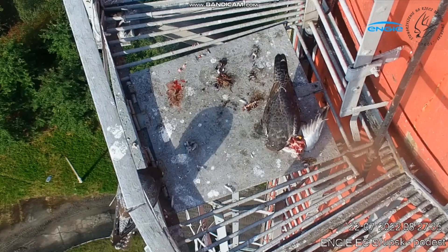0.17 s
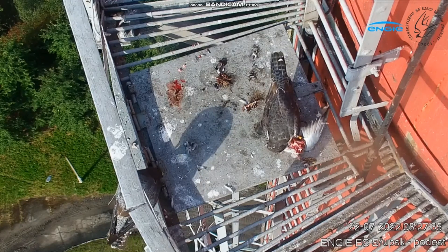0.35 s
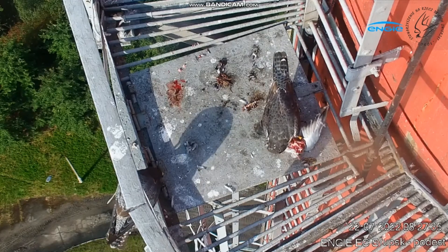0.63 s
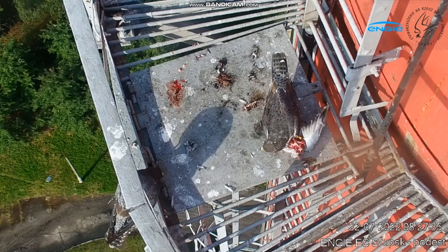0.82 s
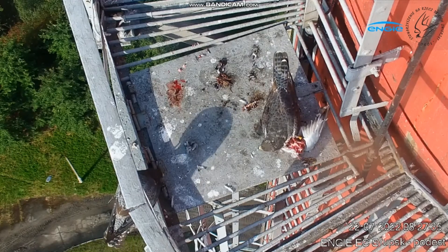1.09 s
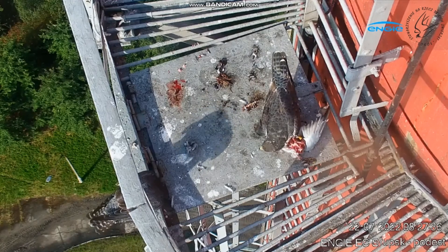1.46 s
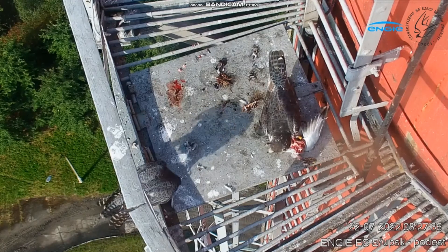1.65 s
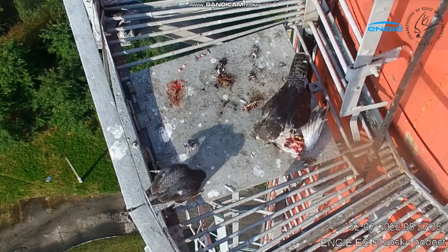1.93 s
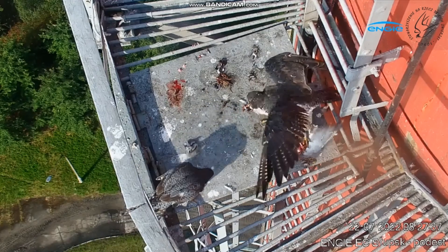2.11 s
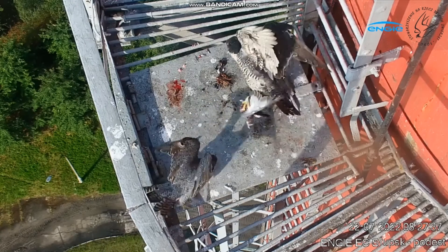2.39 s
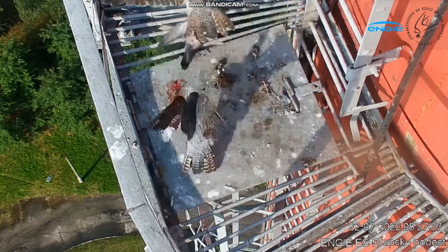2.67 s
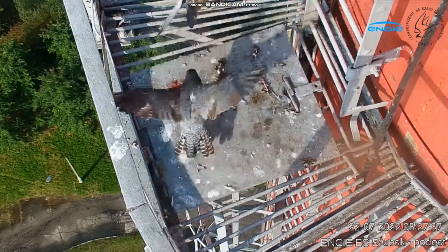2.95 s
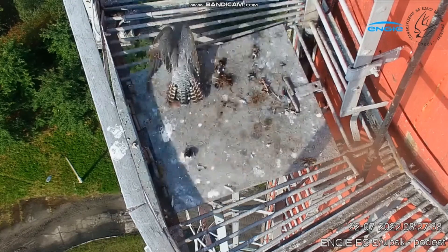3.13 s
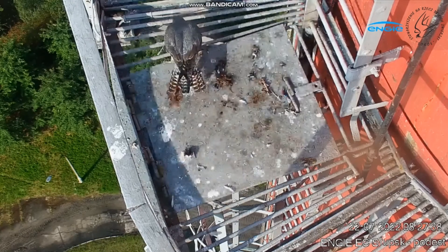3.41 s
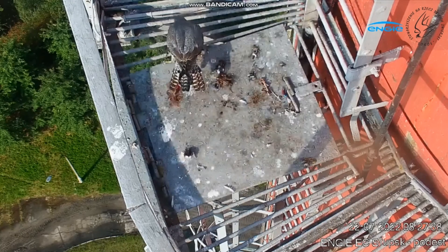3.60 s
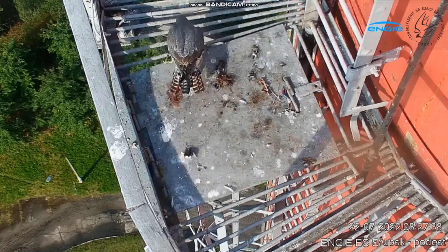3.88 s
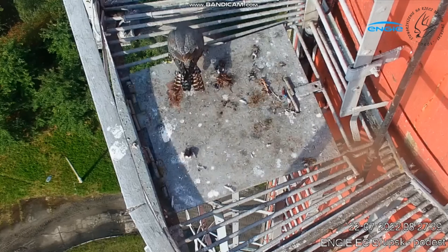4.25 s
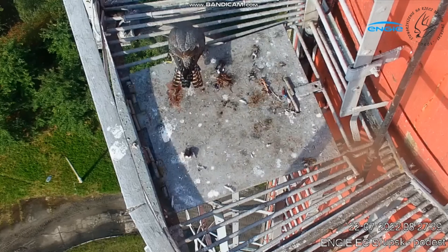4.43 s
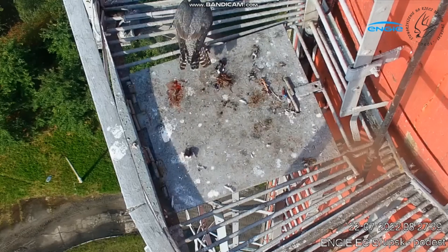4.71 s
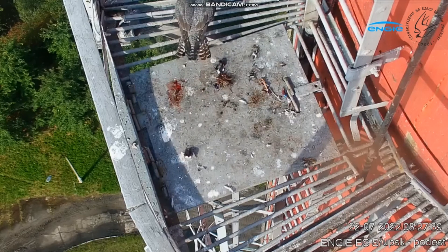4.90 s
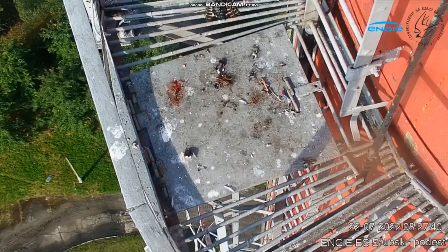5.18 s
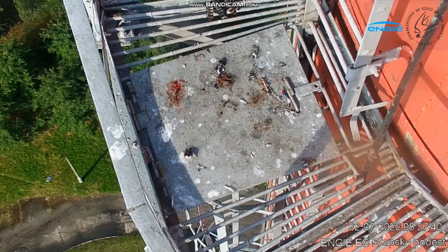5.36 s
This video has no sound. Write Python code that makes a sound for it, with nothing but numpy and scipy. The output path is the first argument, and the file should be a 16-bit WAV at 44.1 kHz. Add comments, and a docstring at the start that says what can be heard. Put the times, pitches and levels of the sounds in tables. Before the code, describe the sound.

Two falcons squabble on a high steel platform in rapid, harsh, squeaky chatter over low rumbling wind, distant traffic and a thin whine.

```python
"""Wind and far traffic rumble under a thin 4 kHz whine; at once two falcons quarrel on a high steel platform.
Their short, mostly falling notes are harmonic stacks from a beating membrane, with sidebands of a second one.
Ragged noise torn by the throat surrounds each note, and low clucks of the slack membrane frame some of them.
Platform echoes are a decaying noise tail; the rumble is flickering bands of noise, the whine a fluttering sine."""
import sys
import numpy as np
from scipy import signal
from scipy.io import wavfile

SR = 44100
rng = np.random.default_rng(int(sys.argv[2]) if len(sys.argv) > 2 else 0)


def master(y):
    """Save y as 16-bit WAV."""
    cut = np.clip(np.atleast_2d(y).T, -1, 1)
    pcm = np.round(cut * 32767)  # scale
    wavfile.write(sys.argv[1], SR, pcm.astype(np.int16))


N = 244755

# Called notes: onset t/s, rise t/ms, fall t/ms, middle pitch f/Hz, sag of the pitch f/Hz,
# relative level/dB of the 1st, 2nd and 3rd harmonic, relative level/dB of the rasp
CALL_NOTES = [(0.149, 26, 22, 2153, 169, -40, -36.5, -47.5, -41.5),
              (0.163, 14, 30, 1716, 121, -37.5, -35.5, -41.5, -56),
              (0.329, 17.3, 21.2, 2181, 84, -18.5, -32.5, -39, -37.5),
              (0.431, 21, 16.5, 2248, 76, -41, -43, -40, -37.5),
              (0.461, 9, 26, 1533, 4, -47, -40, -63, -55.5),
              (0.608, 17, 21.5, 2266, 145, -22, -32, -41.5, -33.5),
              (0.635, 12.9, 15.6, 1543, -60, -40.5, -28, -46, -29.5),
              (0.815, 22.7, 6.5, 2368, 72, -18, -26.5, -42.5, -28.5),
              (0.894, 31.5, 14, 2283, 246, -38.5, -37, -41, -42),
              (1.07, 32.7, 14.4, 2293, 279, -14, -24.5, -35, -33.5),
              (1.139, 15, 45, 1813, 502, -45.5, -37.5, -46, -43),
              (1.272, 15.6, 24, 2228, 33, -22.5, -41, -43.5, -57),
              (1.303, 13.1, 30.4, 1941, 247, -28.5, -27, -40, -36.5),
              (1.434, 28, 22, 1830, 27, -49.5, -47, -50, -47),
              (1.525, 18.2, 4.3, 1797, 42, -40.5, -41.5, -44, -54),
              (1.613, 23.4, 6.4, 1850, 100, -30.5, -38.5, -46.5, -47.5),
              (1.67, 33.5, 5.5, 2160, 142, -34, -32, -46, -34.5),
              (1.703, 8.6, 12, 1770, 147, -33.5, -38, -44.5, -56),
              (1.806, 20, 15.5, 1845, 53, -61, -39.5, -44, -59),
              (1.845, 20.8, 7.3, 1960, 154, -33, -46.5, -42, -59),
              (1.935, 30, 6.5, 2304, -10, -33, -35, -64, -34.5),
              (1.971, 25.3, 5.4, 1538, -42, -47.5, -31, -57, -34),
              (2.087, 15, 16.4, 2304, 138, -46.5, -43, -48.5, -49.5),
              (2.151, 27.4, 7.1, 2388, 50, -37, -32.5, -62, -30.5),
              (2.242, 7.1, 27, 2037, 29, -43, -40.5, -34.5, -43),
              (2.267, 9, 13, 2310, 99, -26, -33.5, -46, -61),
              (2.407, 28.3, 11.4, 2310, 159, -26.5, -26.5, -62, -30.5),
              (2.415, 13.8, 23.5, 2062, 42, -19.5, -29, -40, -36),
              (2.535, 18, 14.6, 2483, 56, -39.5, -42, -53, -48.5),
              (2.609, 15.4, 32, 2223, 3, -33, -38.5, -73, -43.5),
              (2.648, 6, 41, 1935, 211, -34, -31.5, -55.5, -41.5),
              (2.715, 19, 13, 2476, 91, -25, -36, -50, -39.5),
              (2.723, 26, 21.0, 1958, 224, -48.5, -44.5, -40, -79),
              (2.815, 9.7, 12, 1826, 24, -55, -51, -74, -61.5),
              (2.909, 8.7, 28.6, 1934, 137, -23.5, -29.5, -38.5, -49.5),
              (2.952, 4.8, 32, 1805, 109, -55, -38.5, -58, -79),
              (3.042, 9.9, 11, 1790, 215, -35.5, -37, -51.5, -58),
              (3.108, 20, 28, 2390, 76, -46.5, -43.5, -51, -49),
              (3.166, 14, 18.4, 1925, 241, -44.5, -44, -48.5, -80),
              (3.289, 28, 2.9, 2386, 101, -24, -34, -49.5, -39),
              (3.364, 14, 17.5, 1899, 93, -55, -38.5, -35, -50.5),
              (3.541, 10.8, 22.5, 1936, 97, -26, -28, -37.5, -40.5),
              (3.576, 29.4, 12.7, 2320, 193, -39.5, -33.5, -62, -38.5),
              (3.634, 19, 24, 2184, 178, -47, -36.5, -41, -42.5),
              (3.738, 3.3, 38, 2020, -9, -39, -31.5, -43.5, -36),
              (3.804, 23.3, 25.4, 2195, 183, -21.5, -23.5, -39.5, -37),
              (3.939, 55, 18.4, 2120, 263, -47, -45, -45, -47.5),
              (4.071, 27, 8.7, 2456, 18, -36, -41, -67, -40),
              (4.118, 49.4, 16, 2145, 218, -24, -28.5, -43.5, -38),
              (4.267, 21, 18, 1947, 202, -34.5, -32, -40.5, -51.5),
              (4.328, 16.1, 30, 2210, 200, -46, -45.5, -48.5, -51),
              (4.494, 42.5, 12, 2230, 201, -23, -36.5, -50, -37.5),
              (4.617, 15.3, 13.5, 2154, -59, -39.5, -52, -53, -52),
              (4.644, 30.6, 10.6, 2406, 62, -34, -36.5, -57, -41.5),
              (4.793, 44.5, 23.5, 2060, 314, -25.5, -31.5, -47, -43.5),
              (4.899, 24, 46.4, 1880, 216.5, -40.5, -36, -41.5, -46),
              (5.114, 9.5, 39, 1803, 112, -27.5, -28, -42, -45),
              (5.173, 21, 28.9, 2182, 165, -33.0, -31, -48.5, -38.5),
              (5.252, 11.9, 24.6, 1983, 115, -45.5, -47, -47.5, -54),
              (5.407, 39, 21, 2032, 263.5, -27.5, -33, -49.5, -53.5),
              (5.471, 23.4, 52.0, 2154, 235, -39.0, -33.5, -52, -40)]
# Flaps of the slack membrane as the voice starts or stops: t/s, peak level of the fundamental/dB, pitch f/Hz
MEMBRANE_CLUCKS = [(0.136, -34.5, 355), (0.318, -20.5, 380), (0.374, -18.5, 397), (0.583, -19.5, 444),
                   (0.636, -23.5, 450), (0.798, -20.5, 462), (0.856, -22.5, 465), (1.054, -18.5, 416),
                   (1.123, -21.5, 395), (2.229, -32, 432), (2.301, -32, 423), (3.787, -26.5, 448),
                   (4.103, -32.5, 413)]
# Spectrum of the noise from the throat: f/Hz, relative level per Hz/dB
THROAT_SPECTRUM = [(600, -7.5), (1000, -29), (1500, -11.5), (2100, -5), (2900, -5.5), (4500, -9.5),
                   (7000, -20), (15800, -77.5)]

SCOOP_HZ, SCOOP_S, BURST_S = 111.1, 0.0068, .014   # notes that rise faster than BURST_S set in sharp
CLIMB = .22   # share of the sag that the pitch climbs before it slides
LOW_NOTE_HZ = 1620   # notes below keep a strong 4th harmonic
RING_HZ, RING_WIDTH_HZ, RING_DB = 12720, 1730, 5   # the open beak lifts the highest harmonics
CRACK_DB, CRACK_S = 12, 0.0048   # a loud and raspy note cracks into broad hiss at its height
TAIL_SPLIT_HZ, TREBLE_TAIL = 2840, 0.29   # above the split, rasp lead and tail shrink to this share
PLATFORM_T60_S, PLATFORM_DB = .12, -17   # decay time and total level of the echoes
WHINE_HZ = 4000
CUTOFF_HZ = 16130


def voices():
    """Harmonic source: a membrane beats near 2 kHz, its pitch and strength shaking from beat to beat."""
    out = np.zeros(N)
    for start, rise_ms, fall_ms, hz, sag_hz, *lowest_db, rasp_db in CALL_NOTES:
        rise, fall = rise_ms / 1000, fall_ms / 1000
        t = np.arange(-rise - .03, fall + .05, 1 / SR)   # 0 at the height of the note
        pitch = glide(t, hz, sag_hz, rise, fall)
        shaken_pitch = pitch * (1 + 0.01 * drift(150, size=len(t)))
        phase = 2 * np.pi * (np.cumsum(shaken_pitch) / SR + rng.random())
        level = swell(t, rise, fall, edge_db=-10.5, bend=1.45)
        note = 0
        for k, db in enumerate(harmonic_levels(lowest_db, hz)):
            shake = from_db(min(5.67 + 2.34 * k, 11.0) * np.tanh(drift(58, size=len(t))))
            squeezed = level ** (1 + 0.095 * k)   # upper harmonics need more effort
            ring_db = RING_DB * np.exp(-(((k + 1) * pitch - RING_HZ) / RING_WIDTH_HZ) ** 2)
            note = note + from_db(db + ring_db + 7.5) * shake * squeezed * np.sin((k + 1) * phase)
        crack = from_db(lowest_db[0] + rasp_db + CRACK_DB) * np.exp(-(t / CRACK_S) ** 2)
        note = note + crack * np.diff(rng.standard_normal(len(t) + 1))
        # the sidebands are rougher away from the height of the note
        rough = (1 - level / 2) * swell(t, rise + 0.012, fall + 0.018, edge_db=-9, bend=2.5)
        note = note + from_db(rasp_db + 8) * rough * sidebands(phase, pitch, t)
        add(out, note, start + rise + t[0])
    return out


def harmonic_levels(lowest_db, hz):
    """Spectral roll-off: harmonics 4 to 8 fall from the one two below, odd and even apart, down to a floor."""
    levels_db = list(lowest_db)
    for k in range(3, 8):
        drop_db = 27.0 if hz > LOW_NOTE_HZ or k > 3 else 8.5
        floor_db = max(lowest_db) - 11.0 - 7.07 * k
        levels_db.append(max(levels_db[k - 2] - drop_db, floor_db))
    return levels_db


def glide(t, hz, sag_hz, rise, fall):
    """Frequency modulation: the pitch finds its place, climbs a little, slides and settles, wavering."""
    middle = .33 * (fall - rise)
    slide = np.tanh((t - middle) / (0.17 * (rise + fall))) / 2
    climb = CLIMB * np.clip((middle - t) / (middle + rise), 0, 1) ** 2
    scoop = SCOOP_HZ * (rise < BURST_S) * np.exp(-np.maximum(t + rise, 0) / SCOOP_S)
    waver = 1 + .005 * drift(35, size=len(t))
    return waver * (hz - sag_hz * (slide + climb) + scoop)


def sidebands(phase, pitch, t):
    """Intermodulation: a slower, unsteady membrane beats against the first, with lines beside each harmonic."""
    slow_hz = pitch * min(rng.uniform(0.35, .6), .5)   # often locked at half the pitch
    slow_phase = 2 * np.pi * np.cumsum(slow_hz * (1 + .07 * drift(70, size=len(t)))) / SR
    out = 0
    for k in range(1, 5):
        for side in (-1, 1):
            flicker_db = 11 * np.tanh(drift(75, size=len(t))) - 6   # breaks up the line
            line_hz = np.maximum(k * pitch + side * slow_hz, 1000)
            gain = from_db(at_hz(THROAT_SPECTRUM, line_hz) + flicker_db)
            out = out + gain * np.sin(k * phase + side * slow_phase)
    return out


def rasp():
    """Turbulence: air torn by the throat in ragged grains leads and outlasts each note and rides on clucks."""
    body, treble = np.zeros(N), np.zeros(N)   # powers, so that overlapping notes add
    for start, rise_ms, fall_ms, *_, rasp_db in CALL_NOTES:
        rise, fall = rise_ms / 1000, fall_ms / 1000
        t = np.arange(-rise - .05, fall + .08, 1 / SR)
        for power, share in ((body, 1), (treble, TREBLE_TAIL)):
            level = swell(t, rise + 0.021 * share, fall + 0.043 * share, edge_db=-11, bend=1.7)
            add(power, (from_db(rasp_db - 2.5) * level) ** 2, start + rise + t[0])
    for s, db, hz in MEMBRANE_CLUCKS:
        puff = from_db(1.29 * db) * np.hanning(round(0.037 * SR))
        add(body, puff ** 2, s - .013)
    torn = banded_noise(THROAT_SPECTRUM, count=36, patchy_db=13, patch_hz=40, together=.3)
    torn = rms_one(torn * from_db(5 * np.tanh(drift(190))))
    low = signal.sosfilt(signal.butter(2, TAIL_SPLIT_HZ, "low", fs=SR, output="sos"), torn)
    high = signal.sosfilt(signal.butter(2, TAIL_SPLIT_HZ, "high", fs=SR, output="sos"), torn)
    return np.sqrt(body) * low - np.sqrt(treble) * high   # the minus avoids a notch at the split


def clucks():
    """Relaxed oscillation: the slack membrane flaps unevenly some nine times, with a buzz of overtones."""
    out = np.zeros(N)
    size = round(0.021 * SR)
    for s, db, hz in MEMBRANE_CLUCKS:
        phase = 2 * np.pi * np.cumsum(hz * (1 + 0.15 * drift(160, size=size))) / SR
        buzz = 0
        for k in range(2, 10):
            overtone_db = -20.5 - 0.83 * k + rng.normal(0, 3.3)
            buzz = buzz + from_db(overtone_db) * np.sin(k * phase)
        add(out, from_db(db) * np.hanning(size) ** 0.53 * (np.sin(phase) + buzz), s - .007)
    return out


def platform(x):
    """Reverberation by convolution: rails, wall and floor scatter a short, dull, lumpy tail."""
    t = np.arange(round(.2 * SR)) / SR
    dull = signal.lfilter([1], [1, -.62], rng.standard_normal(len(t)))
    tail = dull * from_db(-60 * t / PLATFORM_T60_S) * (t > .003)   # first echoes after 3 ms
    tail = tail * from_db(7 * drift(90, size=len(t)))
    unit_tail = tail / np.sqrt(np.sum(tail ** 2))
    return x + from_db(PLATFORM_DB) * signal.fftconvolve(x, unit_tail)[:N]


def air():
    """Broadband noise: gusting wind and far traffic, bands that flicker largely together."""
    # Spectrum of the rumble: f/Hz, relative level per Hz/dB
    rumble_spectrum = [(25, -1.5), (80, 7.5), (140, -4.5), (190, 5.5), (250, -13), (350, 2.5), (750, -17.5),
                       (1300, -26), (4000, -39.5), (11000, -51.5)]
    # Slow course of the rumble: t/s, level/dB
    rumble_level = [(0, -47.5), (1.3, -43), (2.3, -50), (4.1, -43.5), (4.6, -49), (5.55, -46.5)]
    rumble = banded_noise(rumble_spectrum, count=24, patchy_db=4.5, patch_hz=16, together=1.6)
    return from_db(curve(rumble_level)) * rumble


def whine():
    """Amplitude modulation: a thin steady-pitched tone whose strength flutters."""
    # Slow course of the tone: t/s, level/dB before the flutter
    tone_level = [(0, -61), (.35, -63), (.8, -73), (1.4, -64), (2.1, -75), (5.55, -79)]
    flutter_db = 4.5 * drift(25)
    return from_db(curve(tone_level) + flutter_db) * np.sin(2 * np.pi * WHINE_HZ * np.arange(N) / SR)


def banded_noise(spectrum, count, patchy_db, patch_hz, together):
    """Subband synthesis: narrow noise bands flicker partly together, partly alone; scaled to rms 1."""
    out = 0
    edges = np.geomspace(spectrum[0][0], spectrum[-1][0], count + 1)
    white, shared = rng.standard_normal((2, N)), drift(patch_hz)
    for k, (low, high) in enumerate(zip(edges, edges[1:])):
        band_pass = signal.butter(2, [low, high], "band", fs=SR, output="sos")
        band = signal.sosfilt(band_pass, white[k % 2])   # neighbours use separate noises
        flicker_db = patchy_db * (together * np.tanh(shared) + np.tanh(drift(patch_hz)))
        out = out + band * from_db(at_hz(spectrum, np.sqrt(low * high)) + flicker_db)
    return rms_one(out)


def swell(t, rise, fall, edge_db, bend):
    """Amplitude envelope: climbs from edge_db to 0 dB at t = 0 and falls again."""
    away = np.interp(t, [-rise, 0, fall], [1, 0, 1])
    beyond = np.maximum(np.maximum(-rise - t, t - fall), 0)
    return from_db(edge_db * away ** bend - 4800 * beyond)   # silent within a few ms outside


def drift(rate_hz, size=N):
    """Low-pass random process: noise twice through a one-pole filter, run in; spread about 1."""
    r = np.exp(-2 * np.pi * rate_hz / SR)
    slow = signal.lfilter([1], [1, -2 * r, r * r], rng.standard_normal(size + 2000))[2000:]
    return slow * np.sqrt((1 - r * r) ** 3 / (1 + r * r))


def at_hz(spectrum, hz):
    """Spectral interpolation: level in dB, straight on a log-frequency axis."""
    table_hz, table_db = np.transpose(spectrum)
    return np.interp(np.log(hz), np.log(table_hz), table_db)


def curve(rows):
    """Linear interpolation: a (t/s, value) table at every sample."""
    return np.interp(np.arange(N) / SR, *np.transpose(rows))


def from_db(db):
    """Logarithmic level: amplitude gain of a level in dB."""
    return 10 ** (np.asarray(db) / 20)


def rms_one(x):
    """Effective value: scaled to rms 1."""
    return x / np.sqrt(np.mean(x ** 2) + 1e-20)


def add(track, sound, s):
    """Superposition: mixes a sound into the track from time s on."""
    at = round(s * SR)
    track[at:at + len(sound)] += sound[:N - at]


def scene():
    """Superposition: birds with their echoes over the gusting air and the whine."""
    birds = voices() + rasp() + clucks()
    return (platform(birds) + air() + whine())[None]


def record(dry):
    """Soft saturation and band limiting: the capsule rounds loud peaks; the top is cut."""
    rounded = .68 * np.tanh(dry / .68)
    return signal.sosfilt(signal.cheby2(16, 80, CUTOFF_HZ, fs=SR, output="sos"), rounded)


dry = scene()
out = record(dry)
master(out)
```